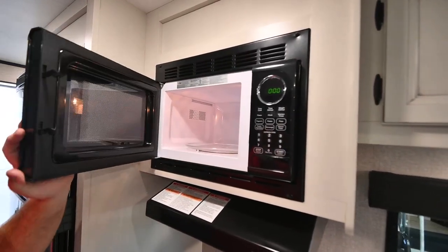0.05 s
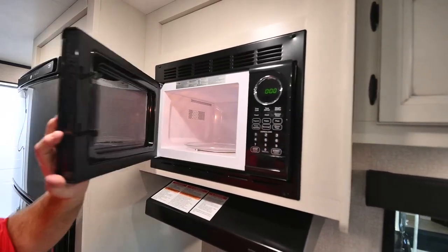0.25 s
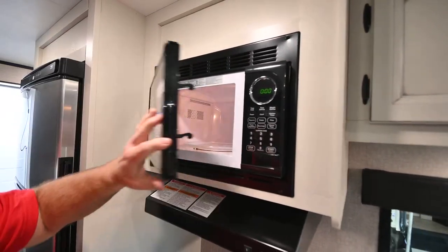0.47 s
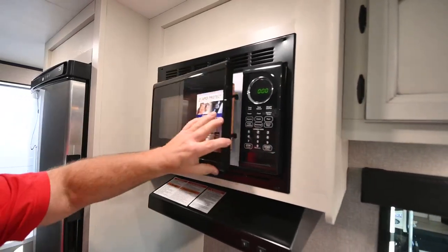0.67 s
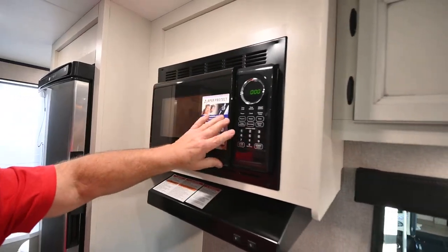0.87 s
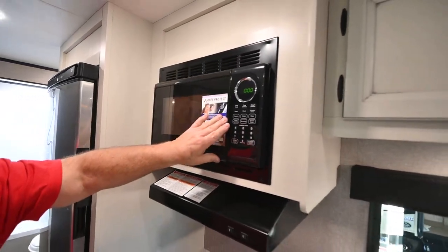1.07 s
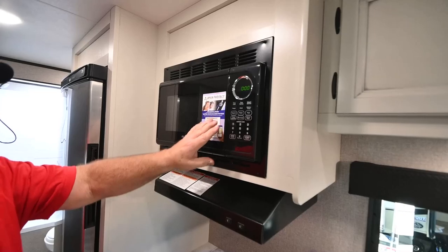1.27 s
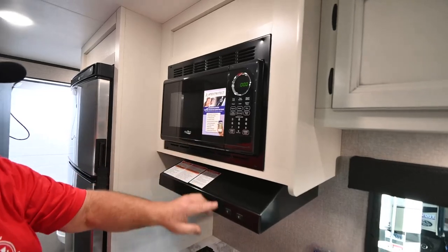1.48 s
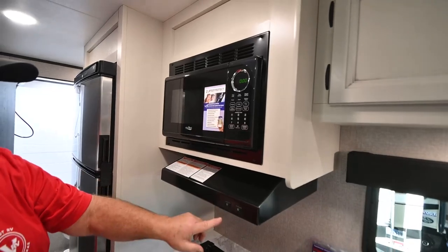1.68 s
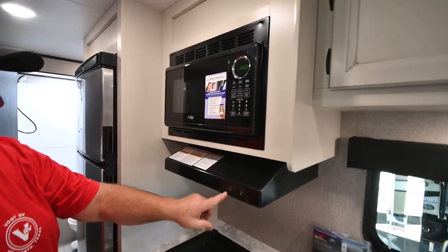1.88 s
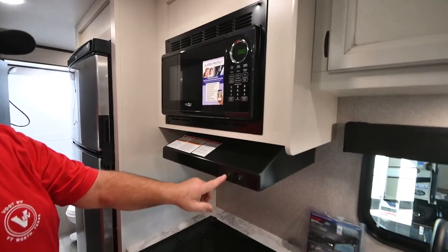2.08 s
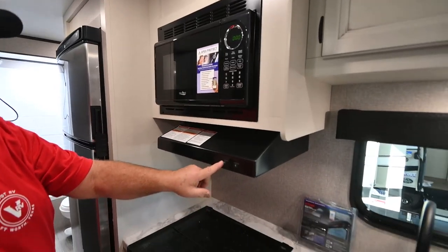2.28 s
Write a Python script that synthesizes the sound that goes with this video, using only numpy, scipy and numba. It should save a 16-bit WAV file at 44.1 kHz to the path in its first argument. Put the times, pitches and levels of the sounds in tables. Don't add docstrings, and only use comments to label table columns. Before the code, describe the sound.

Microwave door closing: soft latch bump, short slide, loud clunking slam and faint glass turntable rattle

```python
import sys
import numpy as np
from scipy import signal
from scipy.io import wavfile
from scipy.ndimage import uniform_filter1d
from numba import njit

SR = 44100
rng = np.random.default_rng(int(sys.argv[2]) if len(sys.argv) > 2 else 0)


def magnitude_from_level(level_db):
    exponent = np.asarray(level_db, float) / 20
    return 10 ** exponent


def wav_out(sig):
    wavfile.write(sys.argv[1], SR, np.round(np.clip(np.atleast_2d(sig).T, -1, 1) * 32767).astype(np.int16))


N = 103238

THIRDS_HZ = 32 * 2 ** np.arange(0, 8.9, 1 / 3)
# start_s, level_db, pitch_hz, t60_s
RATTLE_EVENTS = [(1.2148, -53, 9000, .04), (1.178, -56, 10000, .02), (1.224, -58, 4300, .02),
                 (1.352, -62, 4300, .03), (1.262, -60, 8000, .03), (1.2916, -56, 8000, .04),
                 (1.322, -61, 7500, .03), (1.343, -59, 8000, .05)]


def on_log(table, hz):
    table = np.array(table, float)
    return np.interp(np.log(hz), np.log(table[:, 0]), table[:, 1])


def unit(x):
    return x / np.sqrt(np.mean(x ** 2))


def add(out, start_s, x):
    i = int(start_s * SR)
    out[i:i + len(x)] += x[:N - i]


def high_pass(x, order, hz):
    return signal.sosfilt(signal.butter(order, hz, "high", fs=SR, output="sos"), x)


def band(x, hz, width_hz):
    edges_hz = np.clip([hz - width_hz / 2, hz + width_hz / 2], 10, 21000)
    return signal.sosfilt(signal.butter(2, edges_hz, "band", fs=SR, output="sos"), x)


def third(x, hz):
    return band(band(x, hz, hz / 3), hz, hz / 3)


def walk(rate_hz):
    hold = int(SR / rate_hz)
    steps = np.repeat(rng.standard_normal(N // hold + 1), hold)
    return unit(uniform_filter1d(uniform_filter1d(steps, hold), hold)[:N])


@njit
def ring(x, hz, t60, gain):
    y = np.zeros(len(x))
    for k in range(len(hz)):
        pole = np.exp(2j * np.pi * hz[k] / SR - np.log(1000.) / (t60[k] * SR))
        state = 0j
        for i in range(len(x)):
            state = state * pole + x[i]
            y[i] += (gain[k] * state).imag
    return y


def struck(hz, t60_s, gain, seconds):
    blow = np.full(int(seconds * SR), 1e-18)
    blow[0] = 1
    y = ring(blow, hz, t60_s, gain + 0j)
    return y / np.sqrt(np.sum(np.abs(gain) ** 2) / 2)


def body(colour, t60, seconds, count):
    detune, spread, size = rng.standard_normal((count, 3)).T
    place = np.linspace(8, 126, count)
    hz = place ** 2 * (1 + .01 * detune)
    decay_s = on_log(t60, hz) * np.exp(0.37 * spread)
    gain = magnitude_from_level(on_log(colour, hz)) * np.sqrt(place / decay_s) * np.tanh(2 * size)
    return struck(hz, decay_s, gain, seconds)


def contacts(events, colour, modes, dense_db, ring_share, push_s):
    # hz, t60_s
    door_t60 = [(100, 0.26), (500, 0.113), (2000, 0.13), (6000, 0.12), (14000, 0.033)]
    out = np.zeros(N)
    hz, db, t60_s = np.array(modes, float).T
    dense_t60 = [(f, s * ring_share) for f, s in door_t60]
    rise = 1 - np.exp(-np.arange(SR // 2) / SR / push_s)
    for start_s, level_db in events:
        strong = struck(hz, t60_s, magnitude_from_level(db + rng.standard_normal(len(hz))), .5)
        dense = body(colour, dense_t60, .5, count=330)
        add(out, start_s, magnitude_from_level(level_db) * rise * (strong + magnitude_from_level(dense_db) * dense))
    return out


def fan_air():
    # hz, density_db
    air_colour = [(30, -10), (125, 0.5), (300, -5.5), (500, -7.5), (1000, -4.5), (2000, -16.5), (2700, -31),
                  (4200, -39)]
    out, swell = 0, walk(0.6)
    for hz in THIRDS_HZ[:23]:
        db = on_log(air_colour, hz) + 0.19 * swell + 1.1 * walk(11.96)
        out = out + magnitude_from_level(db) * third(rng.standard_normal(N), hz)
    return magnitude_from_level(-56.5) * unit(out)


def motor_hum():
    # time_s, level_db
    hum_swell = [(0, -5), (.3, 1.5), (.85, 4), (1.0, -11), (2.34, -2.5)]
    hum_hz, hum_width_hz, hum_db = 132.7, 5.36, -62
    pitch_hz = hum_hz + hum_width_hz / 4 * walk(11.57)
    hum = np.sin(2 * np.pi * np.cumsum(pitch_hz) / SR) * magnitude_from_level(0.91 * walk(13))
    swell_db = np.interp(np.arange(N) / SR, *np.array(hum_swell).T)
    return magnitude_from_level(hum_db + swell_db) * hum


def microphone_hiss():
    hiss_db, hiss_hz, hiss_width_hz = -78.5, 9500, 14000
    noise = signal.lfilter([1], [1, -.45], rng.standard_normal(N))
    return magnitude_from_level(hiss_db) * unit(band(noise, hiss_hz, hiss_width_hz))


def taps():
    # start_s, level_db, pitch_hz, t60_s
    tap_events = [(0.36, -50.5, 370, 0.046), (.359, -55, 800, 0.031), (1.116, -28, 470, 0.031),
                  (1.226, -41, 273, .09), (1.234, -39.5, 450, 0.063), (0.76, -55.5, 780, 0.26),
                  (1.303, -46, 400, 0.04), (0.96, -48, 210, 0.27), (1.003, -46, 554, 0.085),
                  (1.056, -56, 410, 0.056), (1.0045, -47, 680, 0.023), (.885, -44.5, 160, 0.23),
                  (1.0932, -33, 560, .02), (1.103, -25.5, 125, 0.1), (1.1024, -19, 550, 0.053),
                  (1.0342, -42, 840, 0.016), (1.17, -36.5, 108, 0.15), (1.261, -42, 94.6, 0.14),
                  (2.1119, -43, 482, 0.038), (.9, -38.5, 430, 0.089), (.894, -39, 314, 0.074),
                  (0.95, -51.5, 2800, 0.033)]
    ratios, gains = np.array([1, .62, 1.7]), np.array([1, .15, .3])
    out = np.zeros(N)
    for start_s, level_db, hz, t60_s in tap_events:
        add(out, start_s, magnitude_from_level(level_db) * struck(hz * ratios, t60_s * np.ones(3), gains, .2))
    return out


def hinge_rubs():
    # start_s, length_s, level_db, top_hz
    rub_events = [
        (0.468, 0.11, -53, 3000),
        (0.656, 0.042, -56, 5000),
        (0.681, 0.1, -52, 5000),
        (0.748, 0.068, -70, 6000),
        (1.058, 0.087, -48.5, 1475),
    ]
    rise_s = 0.006
    out, t = np.zeros(N), np.arange(SR // 5) / SR
    for start_s, length_s, level_db, top_hz in rub_events:
        grit = rng.standard_normal(len(t)) * magnitude_from_level(0.75 * walk(165)[:len(t)])
        bright = signal.lfilter([.5], [1, -np.exp(-2 * np.pi * top_hz / SR)], band(grit, 3400, 6800))
        grit = unit(band(grit, 1220, 1276) + 0.15 * bright)
        add(out, start_s, magnitude_from_level(level_db) * grit * (t / rise_s).clip(0, 1) * np.exp(-3 * t / length_s))
    return out


def ticks():
    # start_s, level_db, pitch_hz, t60_s
    tick_events = [(0.691, -54, 9250, 0.0051), (0.694, -62, 3300, 0.02), (.7593, -57, 8500, .005),
                   (0.7601, -56, 5300, .006), (0.767, -66, 4300, 0.018), (.793, -61, 8500, .004),
                   (.667, -64, 13300, .005), (.815, -75, 8070, 0.011), (1.0349, -54, 7800, .004),
                   (1.0349, -49, 2700, .006), (0.858, -58, 3980, 0.056), (0.8627, -54.5, 6200, 0.09),
                   (1.035, -52, 5440, 0.0043), (1.0554, -61, 6960, 0.021), (1.054, -54.5, 2800, 0.035),
                   (1.093, -37, 7150, 0.027), (1.103, -27, 8200, 0.034), (1.106, -28.5, 7670, 0.068)]
    out, t = np.zeros(N), np.arange(SR // 5) / SR
    for start_s, level_db, hz, t60_s in tick_events + RATTLE_EVENTS:
        noise = unit(band(rng.standard_normal(len(t)), hz, 0.48 * hz))
        add(out, start_s, magnitude_from_level(level_db - 60 * t / t60_s) * noise)
    return out


def turntable():
    # hz, level_db under the rattle, t60_s
    glass_modes = [(4300, -1, .09), (7700, -9, .05), (5200, -6, .05), (3700, -8, .05)]
    out = np.zeros(N)
    hz, db, t60_s = np.array(glass_modes, float).T
    for start_s, level_db, _, _ in RATTLE_EVENTS:
        detune, size = rng.standard_normal((2, len(hz)))
        chink = struck(hz * (1 + .012 * detune), t60_s, magnitude_from_level(db + 3 * size), .15)
        add(out, start_s + .004, magnitude_from_level(level_db - 4) * chink)
    return out


def cabinet():
    # hz, level_db
    boom_colour = [(45, -32), (90, -2.5), (300, -5), (900, -6), (2500, -16), (4200, -24), (8000, -32),
                   (15000, -49)]
    # hz, t60_s
    boom_t60 = [(80, 1.1), (200, 1.5), (600, 1.), (1500, .9), (3000, .6), (5000, .5), (14000, .4)]
    # hz, level_db, t60_s
    wall_modes = [(90, -8.5, 1.2), (135.2, -8, 0.9), (171.2, -13.5, 2.8), (306, 3, 0.6), (450, 10, 0.41),
                  (873, 0.5, 0.83)]
    boom_db, swell_s = -28.5, 0.2
    out, t = np.zeros(N), np.arange(SR * 5 // 4) / SR
    wall_hz, wall_db, wall_t60_s = np.array(wall_modes, float).T
    # start_s, level_db, tilt_db per octave
    for start_s, level_db, tilt_db in ((.875, -20.5, -2.5), (1.102, -5, 0.0044)):
        boom = 0
        for hz in THIRDS_HZ:
            decay_db = 60 * (t - .1) / on_log(boom_t60, hz)
            db = on_log(boom_colour, hz) - decay_db + 1.3 * walk(24)[:len(t)]
            boom = boom + magnitude_from_level(db + tilt_db * np.log2(hz / 500)) * third(rng.standard_normal(len(t)), hz)
        boom = boom / np.sqrt(np.mean(boom[SR // 20:SR // 7] ** 2))
        walls = struck(wall_hz, wall_t60_s, magnitude_from_level(wall_db), 1.25) * magnitude_from_level(0.65 * walk(20)[:len(t)])
        boom = boom + magnitude_from_level(6.5) * walls
        add(out, start_s, magnitude_from_level(boom_db + level_db) * boom * (1 - np.exp(-t / swell_s)))
    return out


def latch_bump():
    # start_s, level_db
    bump_events = [
        (.857, -44.5),
        (.8645, -33.5),
        (.868, -33.5),
        (.8745, -32),
        (.8805, -34),
        (.892, -44),
        (.900, -45.5),
        (.9075, -46.5),
        (.920, -50),
    ]
    # hz, level_db
    bump_colour = [(55, -33), (120, -4.5), (350, -6), (520, -7.5), (1200, -5), (3000, -19), (6000, -33.5),
                   (15000, -48.5)]
    # hz, level_db, t60_s
    lean_modes = [(117.2, -15, 0.21), (192, -17, 0.54), (300, -16, 0.061), (480.5, -15, 0.21),
                  (521.7, -1, 0.078), (675, -11, 0.18), (909, -1, 0.095), (1216, -0.5, 0.053),
                  (1367, -11, 0.11), (1460, -9, 0.097), (2110, -8, 0.069), (2220, -12.5, .1),
                  (2620, -15.5, 0.074), (3180, -20, 0.049)]
    return contacts(bump_events, bump_colour, lean_modes, dense_db=-5.0, ring_share=1.0, push_s=0.00058)


def hook_slide():
    # start_s, level_db
    slide_events = [
        (1.000, -52),
        (1.034, -49.5),
        (1.0546, -44),
        (1.062, -45),
        (1.075, -46.5),
    ]
    # hz, level_db
    slide_colour = [(35, -32), (60, -24), (378, -5), (493, 9), (2600, -10.5), (3470, -33), (12000, -58.5),
                    (15600, -73), (22000, -120)]
    # hz, level_db, t60_s
    lever_modes = [(173.6, -7, .2), (473, 4, 0.057), (930, -6.5, 0.12), (1448, -4, 0.15), (1990, -10, 0.12),
                   (2580, -10, 0.043), (3050, -14.5, 0.083)]
    return contacts(slide_events, slide_colour, lever_modes, dense_db=-2.5, ring_share=0.78, push_s=0.00072)


def door_slam():
    # start_s, level_db
    slam_events = [
        (1.092, -35.5),
        (1.0975, -32.5),
        (1.1022, -14),
        (1.105, -23),
        (1.108, -24),
        (1.119, -29),
        (1.128, -29.5),
        (1.139, -27.5),
        (1.160, -36.5),
    ]
    # hz, level_db
    slam_colour = [(55, -35), (123, -8.5), (290, -16), (550, -8), (1100, -14.5), (2500, -17), (3400, -24.5),
                   (15500, -36)]
    # hz, level_db, t60_s
    panel_modes = [(125.5, -7.5, 0.061), (347, -16, 0.25), (382.4, -17, 0.27), (501, -1, .17),
                   (583, 5.5, 0.11), (660, -12.5, 0.17), (769, -5, 0.055), (1004.5, -2, 0.06),
                   (1199, -4.5, 0.082), (1358, -14, .1), (1790, -6, .06), (2013, -4.5, .09),
                   (2204, -10, 0.076), (2666, -4.5, 0.086)]
    return contacts(slam_events, slam_colour, panel_modes, dense_db=-5.0, ring_share=1.08, push_s=0.00095)


def scene():
    hall = fan_air() + motor_hum() + microphone_hiss()
    small_sounds = taps() + hinge_rubs() + ticks()
    door = latch_bump() + hook_slide() + door_slam()
    door = high_pass(door + small_sounds, 3, 84)
    return (hall + turntable() + cabinet() + door)[None]


def roll_off(x):
    return signal.sosfilt(signal.butter(12, 16280, fs=SR, output="sos"), x)


def record(dry):
    mix = high_pass(dry, 2, 58)
    mix = signal.sosfilt(signal.ellip(8, .2, 60, 16000, fs=SR, output="sos"), mix)
    return roll_off(mix)


dry = scene()
out = record(dry)
wav_out(out)
```